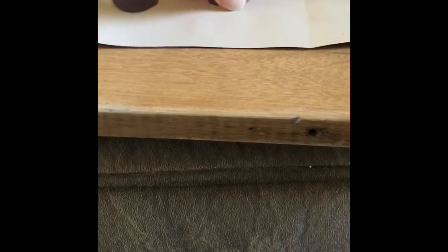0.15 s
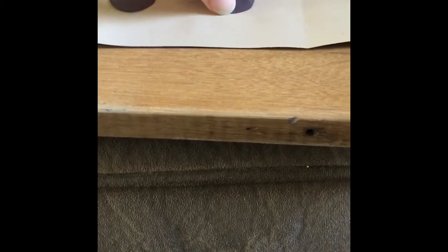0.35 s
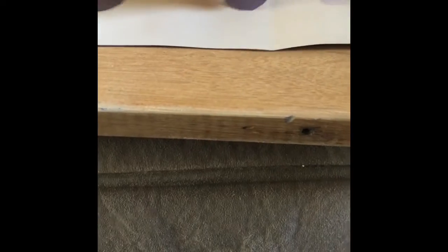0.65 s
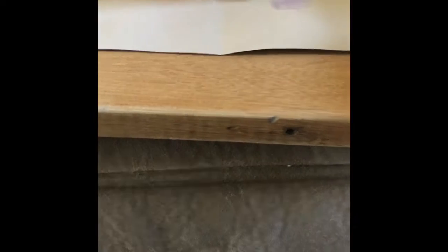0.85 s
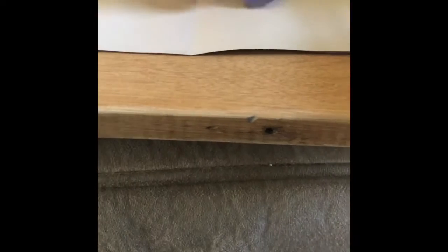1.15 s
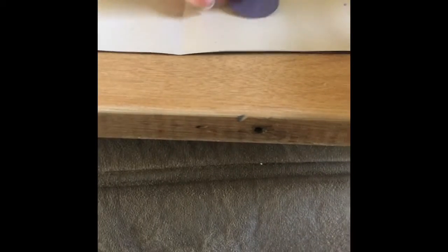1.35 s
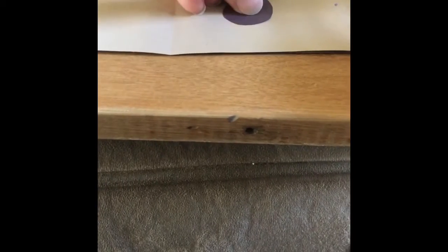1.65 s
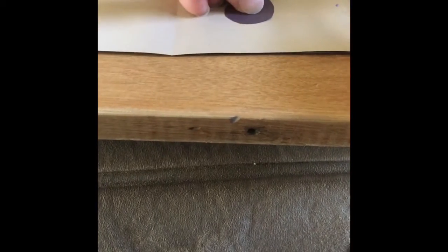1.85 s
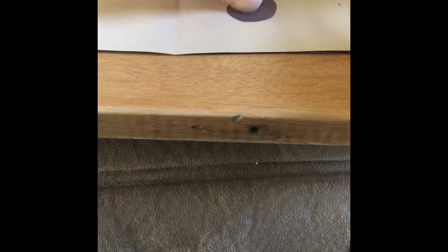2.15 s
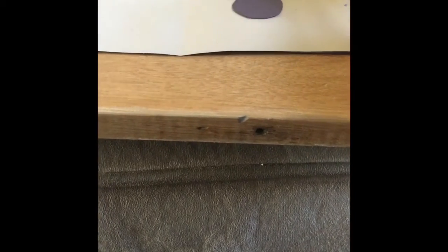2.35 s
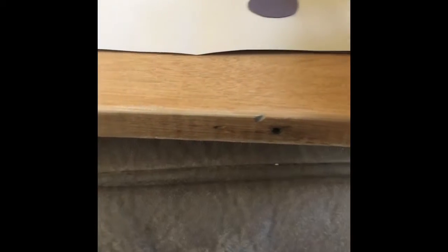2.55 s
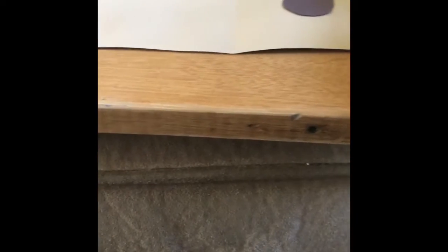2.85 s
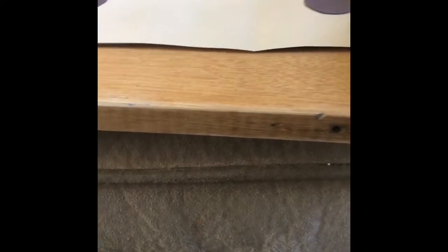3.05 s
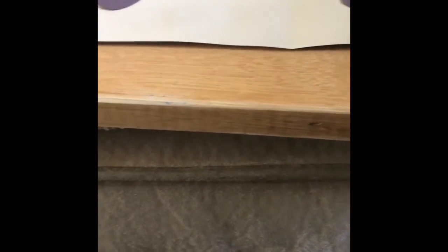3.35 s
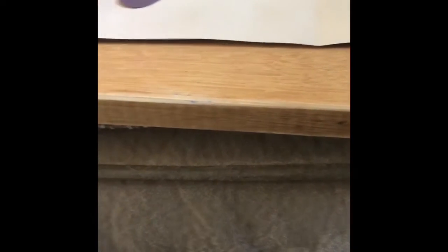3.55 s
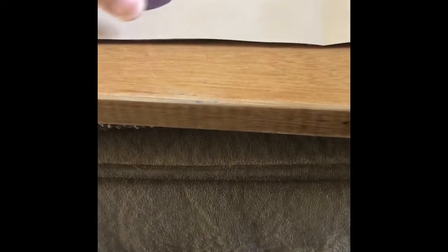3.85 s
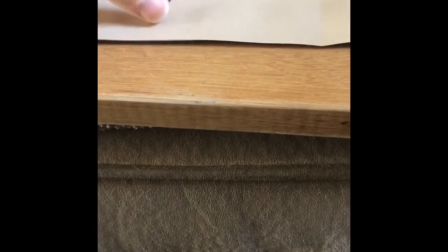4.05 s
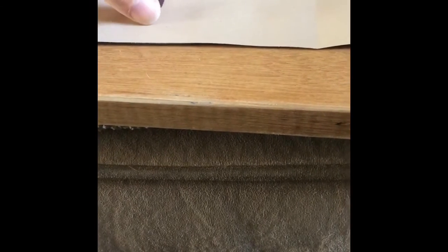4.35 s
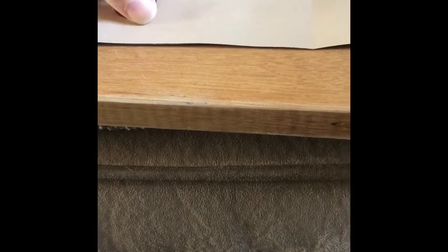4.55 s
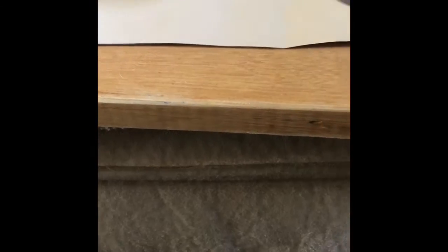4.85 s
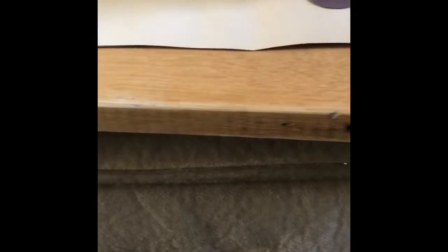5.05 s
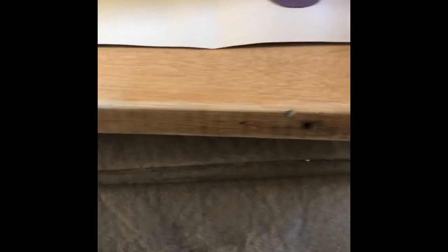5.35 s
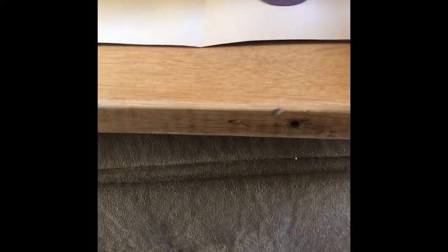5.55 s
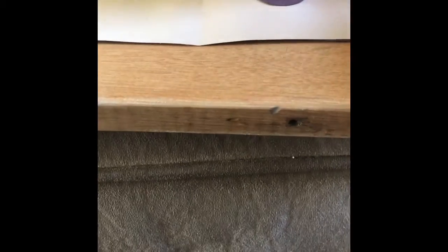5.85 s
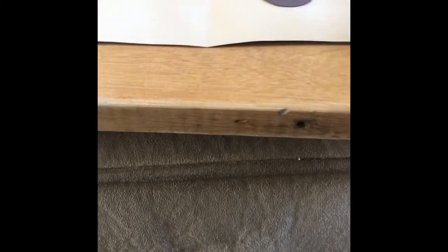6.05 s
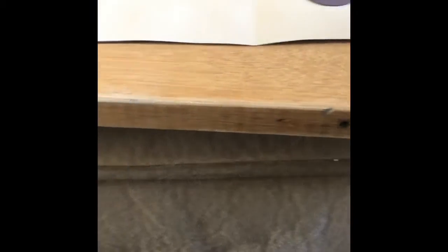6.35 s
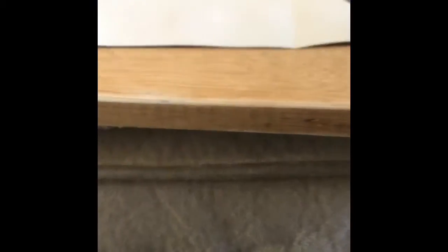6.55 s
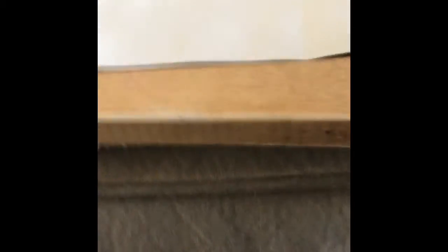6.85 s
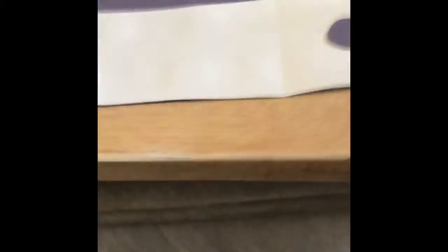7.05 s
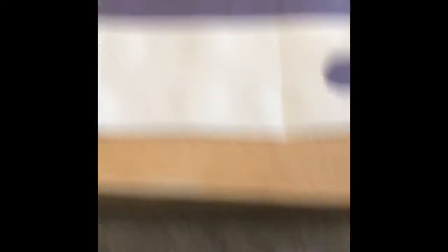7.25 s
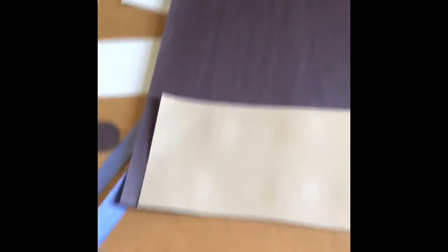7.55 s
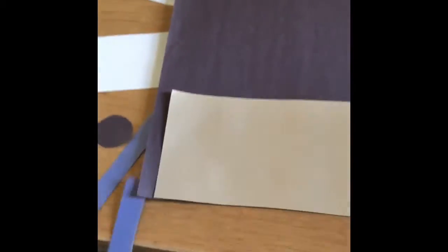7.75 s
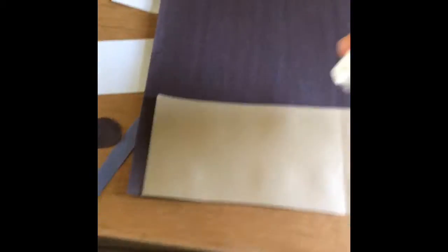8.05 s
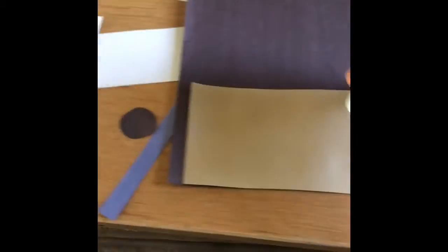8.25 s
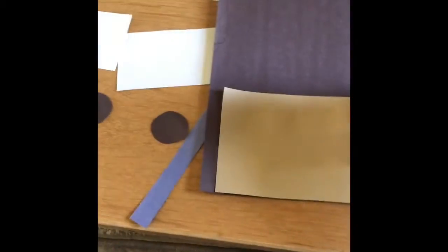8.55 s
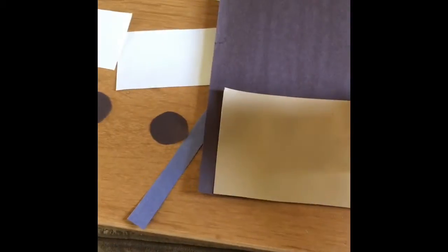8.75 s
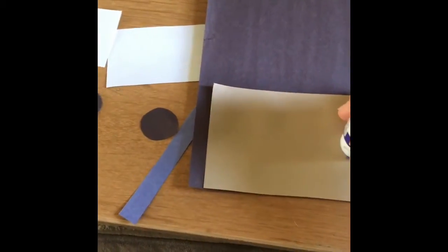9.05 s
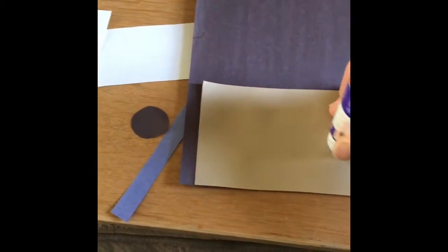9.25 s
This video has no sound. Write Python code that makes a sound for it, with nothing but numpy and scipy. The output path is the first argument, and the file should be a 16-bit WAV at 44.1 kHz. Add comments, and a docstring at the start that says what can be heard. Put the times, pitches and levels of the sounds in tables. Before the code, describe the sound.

Close papery scrapes and sharp tacky clicks as glued pieces are pressed on a tabletop, soft thumps following, in a quiet humming room.

```python
"""Fingertips press and slide glued paper pieces on a wooden table, close to a hand-held phone in a quiet room.
Throughout, filtered noise makes the room's rumble and hiss, and wavering sines an appliance's hum. From the first
moment strokes hiss: noise of catching fibres, shaped by the sheet's modes and bands. Soon tacky paper snaps, as
decaying modes over soft table knocks, sharpest past the middle; faint ticks fall at random. In the second half
the hand that holds the phone adds dull bumps, as low decaying sines."""
import sys
import numpy as np
from scipy import signal
from scipy.fft import rfft, irfft, next_fast_len
from scipy.io import wavfile
from scipy.ndimage import uniform_filter1d

SR = 44100
rng = np.random.default_rng(int(sys.argv[2]) if len(sys.argv) > 2 else 0)


def store_pcm(level_fs):
    """Save levels as 16-bit WAV."""
    pcm = np.round(np.clip(level_fs, -1, 1) * 32767).astype(np.int16)
    wavfile.write(sys.argv[1], SR, np.atleast_2d(pcm).T)


N = 414981


def undb(db):
    """Logarithmic level: 20 dB is a factor of ten in amplitude."""
    return 10 ** (np.asarray(db) / 20)


def unit(x):
    """Mean power: scale a signal to rms 1."""
    return x / np.sqrt(np.mean(x ** 2))


def colour(x, points):
    """Linear filtering: multiply the spectrum by a gain drawn through points of f/Hz, level/dB."""
    hz, db = np.transpose(points)
    size = next_fast_len(len(x))
    f = np.arange(size // 2 + 1) * SR / size + 1  # the 1 Hz keeps the logarithm finite
    gain = undb(np.interp(np.log(f), np.log(hz), db))
    return irfft(rfft(x, size) * gain, size)[:len(x)]


def resonance(x, hz, width):
    """Damped oscillator: a two-pole band-pass, its width in Hz."""
    return signal.lfilter(*signal.iirpeak(min(hz, SR / 2.5), hz / width, SR), x)


def walk(count):
    """Slow random modulation: count random values a second, joined by slopes and scaled by 2.7."""
    k = SR // count
    steps = np.repeat(rng.standard_normal(N // k + 1), k)
    return 2.7 * uniform_filter1d(steps, k)[:N]


def decay(t, t60):
    """Exponential decay: the level falls 60 dB in t60 seconds."""
    return np.exp(-np.log(1000) * t / t60)


def add(out, s, x):
    """Superposition: mix x into out from time s."""
    i = int(s * SR)
    out[i:i + len(x)] += x[:N - i]


def room(level_db=-55.5, split_hz=450, waver_rad=0.92):
    """Stationary noise and beating: rumble and faint hiss, with motor, mains and cabinet tones."""
    # spectrum of the room noise: f/Hz, level/dB
    room_spectrum = [(25, -34.5), (45, -10), (70, -10), (110, -9), (140, -8.5), (200, -7), (250, -0.5),
                     (290, -9), (380, -9), (520, -17.5), (660, -23), (1100, -27), (1500, -33.5),
                     (3300, -35.5), (6000, -42), (16000, -47)]
    # swell of the room's upper hiss: t/s, level/dB
    hiss_swell = [(0, 4.5), (2.5, 1), (4, 2.5), (6, 2.5), (7, 4.5), (8.2, 1.5), (8.6, 0.5), (9.41, 1.5)]
    # motor and mains tones: f/Hz, rms level/dB
    hum_tones = [(44.8, -75.5), (56.65, -67), (113.3, -71), (116.8, -61), (120, -64)]
    # noisy resonances of the cabinet: f/Hz, width/Hz, rms level/dB
    cabinet_modes = [(217.3, 11.5, -63), (261.5, 21.3, -65), (350.1, 18.7, -65)]
    t = np.arange(N) / SR
    air = undb(level_db) * unit(colour(rng.standard_normal(N), room_spectrum))
    upper = signal.sosfilt(signal.butter(1, split_hz, "high", fs=SR, output="sos"), air)
    swell_db = np.interp(t, *np.transpose(hiss_swell)) + 0.8 * walk(count=6)
    air += (undb(swell_db) - 1) * upper
    for hz, db in hum_tones:
        phase = 2 * np.pi * (hz * t + rng.random()) + waver_rad * walk(count=2)  # radians per unit of walk
        air += np.sqrt(2) * undb(db) * np.sin(phase)
    for hz, width, db in cabinet_modes:
        drone = resonance(resonance(rng.standard_normal(N), hz, width), hz, width)
        air += undb(db) * unit(drone)
    return air


def bumps(push_s=0.0024):
    """Damped vibration: soft pushes of the hand ring low and sag in pitch."""
    # bumps of the hand that holds the phone: t/s, level of the decay at its start/dB, starting f/Hz, t60/s
    hand_bumps = [(5.2, -47, 70.5, 0.25), (5.299, -46, 90, 0.091), (6.555, -43, 252, .06),
                  (6.577, -39.5, 87, 0.12), (6.605, -40, 80, 0.13), (6.6, -51, 554, 0.037),
                  (6.665, -40, 520, 0.029), (6.768, -39, 587, 0.042), (6.78, -36, 80, 0.056),
                  (6.88, -37, 150, 0.075), (6.965, -40, 374, 0.042), (6.984, -40, 554, 0.036),
                  (7.004, -30, 414, 0.025), (7.1, -37.5, 153, 0.096), (7.186, -34, 110, 0.054),
                  (7.86, -30, 244, 0.08), (7.873, -34, 94, 0.15)]
    out, t = np.zeros(N), np.arange(SR // 2) / SR
    for s, db, hz, t60 in hand_bumps:
        swing = np.sin(2 * np.pi * hz * t * (1 - 0.41 * t))
        onset = 1 - np.exp(-t / push_s)
        add(out, s, undb(db) * onset * decay(t, t60) * swing)
    return out


def creases(least_db=-56.5, spread_db=2.0, low_hz=4000, high_hz=13000, count=70):
    """Impulse response: faint ticks of the settling sheet, random in moment, peak level and pitch."""
    out, click = np.zeros(N), np.arange(SR // 300) == 0
    for when, size, pitch in rng.random((count, 3)):
        hz = low_hz * (high_hz / low_hz) ** pitch
        tick = resonance(1. * click, hz, hz / 2)
        peak_db = least_db - spread_db * np.log(size)
        add(out, when * N / SR, undb(peak_db) * tick / abs(tick).max())
    return out


def snaps(fall_db=5.5, knock_fall_db=11.5, scatter_db=3.0, after_db=-25.0, tear_s=0.0014, late_s=0.0014,
          knock_cycles=1.146):
    """Modal excitation: the bond yields in one jerk and many small ones, and paper and table ring in answer."""
    # snaps of tacky paper: t/s (each sounds late_s later), peak level/dB, f of the strongest paper modes/Hz,
    # table knock level against that peak/dB, f of the knock/Hz
    snap_events = [(0.157, -26, 8200, -38, 490), (0.212, -27, 7300, -36, 533),
                   (0.38, -14.5, 6700, -15, 1290), (0.436, -33.5, 3870, -29, 689),
                   (1.0393, -45, 13700, -21, 592), (1.068, -52, 3330, -15, 495),
                   (1.169, -51, 3300, -5, 509), (1.255, -52, 12100, -16, 517), (1.547, -34, 7440, -16, 676),
                   (1.9862, -25, 8200, -21, 1180), (2.0013, -38, 2770, -10, 549),
                   (2.8439, -45.5, 12200, -10, 511), (3.0738, -53, 2770, -15, 503),
                   (3.107, -57, 3060, 2, 549), (3.3557, -19, 6300, -13, 490), (3.3867, -50, 4910, 3, 509),
                   (3.4126, -31.5, 3170, -6, 505), (4.432, -23.5, 8300, -25, 485),
                   (4.5006, -26, 4500, -11.5, 1390), (4.979, -55, 7100, -8, 557),
                   (5.5805, -36.5, 9350, -25, 568), (5.6267, -5, 9700, -25, 1170),
                   (5.659, -16, 8700, -27, 1500), (5.664, -26, 6960, -27, 544),
                   (5.8483, -51, 6500, -10, 570), (6.1968, -46, 12000, -25, 500),
                   (6.5556, -41.5, 4400, -5.5, 724), (6.5928, -39.5, 5340, -2, 676),
                   (6.7664, -40.5, 3570, 6, 620), (6.789, -36, 4440, -28, 482),
                   (6.9637, -46, 4080, 10, 510), (7.0087, -51.5, 4130, 10, 490),
                   (7.294, -44, 4390, -14, 697), (8.167, -31.5, 3500, -40, 482),
                   (8.1844, -42, 4850, -21, 482), (8.2473, -33.5, 6270, -25, 692),
                   (8.2609, -34.5, 4070, -12, 824), (8.294, -40, 4700, -26, 576),
                   (8.6347, -47, 4410, -17, 746), (9.042, -44, 7470, -29, 483),
                   (9.2577, -46, 9800, -17, 500)]
    # modes that a snap rings, table top below 1500 Hz and paper above: f/Hz, t60/s
    ring_modes = [(480, 0.018), (700, .015), (950, 0.019), (1300, 0.014), (1700, 0.0052), (2150, 0.0027),
                  (2750, 0.005), (3500, 0.003), (4500, 0.0052), (5400, 0.0028), (6600, 0.0029),
                  (7800, 0.0031), (9500, 0.0035), (11300, 0.002), (14000, 0.00187)]
    out, t = np.zeros(N), np.arange(SR // 25) / SR
    hz, t60 = np.transpose(ring_modes)[:, :, None]
    mode_hz = hz[:, 0]
    wood = mode_hz < 1500
    ring = np.sin(2 * np.pi * hz * t) * decay(t, t60)
    # bending waves in the board are slower the lower they are, so the low modes arrive late
    late = np.maximum(t - knock_cycles / hz, 0)
    board = np.sin(2 * np.pi * hz * late) * decay(late, t60)
    # neighbouring modes start in opposite directions, so no holes open between them
    signs = (-1) ** np.arange(len(ring_modes))
    chance = rng.standard_normal((len(snap_events), len(ring_modes)))
    jerks = rng.standard_normal((len(snap_events), 200))
    for (s, peak_db, bright_hz, knock_db, knock_hz), c, jerk in zip(snap_events, chance, jerks):
        # modes weaken by fall_db or knock_fall_db for each octave from the strongest pitch
        gain = undb(scatter_db * c - fall_db * abs(np.log2(mode_hz / bright_hz)))
        paper = (gain * ~wood * signs) @ ring
        push = undb(after_db) * jerk * np.exp(-t[:len(jerk)] / tear_s)
        push[0] = 1  # the main jerk
        paper = np.convolve(paper, push)
        knock_gain = undb(-knock_fall_db * abs(np.log2(mode_hz / knock_hz)))
        table = (knock_gain * wood) @ board
        add(out, s + late_s, undb(peak_db) * paper / abs(paper).max())
        add(out, s + late_s, undb(peak_db + knock_db) * table / abs(table).max())
    return out


def stroke_db(t, start_s, attack_s, hold_s, release_s, db, edge_db=21):
    """Envelope linear in dB: rise by edge_db, hold, fall by edge_db a release time for two; else silence."""
    early = (start_s + attack_s - t) / max(attack_s, 1 / SR)
    late = (t - start_s - attack_s - hold_s) / max(release_s, 1 / SR)
    off = np.maximum(np.maximum(early, late), 0)
    return np.where((early < 1) & (late < 2), db - edge_db * off, -np.inf)


def slides(catch_db=3.0, flicker_db=0.5, patchy_db=2.0, waver_db=2.0, sharp=9.24, pivot_hz=6000, edge_s=0.0015):
    """Stick-slip friction: fibres catch and let go by the thousand, and the sheet's modes colour the noise."""
    # ways the sheet sings, by name: f/Hz, width of each filter pass/Hz, level against the broad hiss/dB,
    # second broad band f/Hz, its level/dB, tilt of the hiss around pivot_hz/(dB per octave)
    singing = {"press": (7200, 2400, -1, 4107, -4.5, 3.1), "rub": (3711, 1000, -5.5, 7050, -2, -4),
               "low": (3313, 648, -3, 8800, -20, 4.5), "airy": (8200, 2800, -32, 13000, -23, 6),
               "sweep": (7100, 3000, -14, 3700, -22, 1.6), "drag": (3302, 600, -13, 8800, -22, 2),
               "dull": (2900, 1300, 7, 1500, 1, -13), "thin": (6700, 800, -13, 13400, -18, 4),
               "scuff": (4298, 1900, -11.5, 9000, -9.5, 1.1),
               "tear": (4502, 2512, -11, 9495.5, -10.5, -1.5),
               "hollow": (1522, 256, -6.5, 13900, -18, -1.5), "dark": (4500, 1902, -5.5, 5500, -34, -2.5),
               "broad": (6500, 4000, -18, 2197, -14, -3), "whine": (10500, 600, -7, 8400, -19, -7),
               "whistle": (4235, 296, 1, 10200, -22, 1)}
    # spectrum of the sheet: f/Hz, level/dB
    sheet_spectrum = [(350, -52), (600, -10), (858, -13.5), (1160, -7.5), (1780, -8), (3210, -4),
                      (5330, -1.5), (8050, -2), (10700, -5.5), (15100, -3.5), (16000, -21)]
    # strokes of a finger or an edge: start t/s, attack/s, hold/s, release/s, level/dB, way the sheet sings
    finger_strokes = [ (0.007, 0.021, 0.042, 0.11, -50, "press"),
                      (0.136, 0.0032, 0.076, 0.034, -45, "press"),
                      (0.141, 0.016, 0.0018, 0.01, -34.5, "press"),
                      (0.267, 0.035, .006, 0.044, -42.5, "press"), (0.34, 0.011, 0.035, .02, -57, "press"),
                      (0.064, 0.018, .035, .012, -54, "press"), (0.263, 0.0086, .004, .01, -51.5, "press"),
                      (0.398, 0.032, .004, 0.065, -49, "rub"),
                      (0.484, 0.0087, 0.013, 0.044, -48.5, "press"),
                      (.515, 0.026, 0.084, 0.21, -40.5, "sweep"), (0.678, .03, 0.12, 0.039, -49, "sweep"),
                      (0.87, .01, 0.051, 0.012, -67, "low"), (1.038, 0.014, .15, .025, -61, "low"),
                      (1.333, 0.0036, 0.11, 0.016, -51.5, "rub"), (1.465, 0.021, .11, 0.022, -51.5, "rub"),
                      (1.494, 0.052, 0.016, .055, -49.5, "scuff"), (1.91, 0.011, .005, .05, -63.5, "press"),
                      (1.956, 0.032, .002, .03, -50.5, "press"), (1.998, 0.019, 0.054, .03, -57, "press"),
                      (2.146, 0.012, 0.0022, 0.0073, -49.5, "airy"), (2.748, .022, .004, 0.085, -60, "low"),
                      (2.922, 0.008, .003, 0.027, -68, "low"), (3.065, 0.012, .002, 0.014, -56, "dull"),
                      (3.096, 0.025, .002, .012, -56.5, "dull"), (3.13, 0.02, 0.13, .04, -80, "rub"),
                      (2.237, 0.027, 0.018, 0.035, -75, "airy"), (3.37, .01, 0.17, .05, -72.5, "airy"),
                      (3.612, 0.068, 0.061, 0.27, -61, "thin"), (3.817, .012, 0.076, 0.077, -59.5, "thin"),
                      (4.079, .027, 0.031, 0.051, -66.5, "airy"), (4.152, 0.054, .005, 0.18, -64.5, "airy"),
                      (4.241, 0.057, .005, 0.055, -61.5, "airy"), (4.5, 0.0083, 0.014, .09, -52.5, "scuff"),
                      (4.554, 0.054, .002, 0.05, -44.5, "scuff"),
                      (4.63, 0.043, .002, 0.059, -39.5, "scuff"), (4.76, 0.067, .015, 0.14, -54, "drag"),
                      (4.89, 0.019, 0.085, 0.022, -63, "drag"), (5.014, 0.041, 0.014, 0.0088, -61, "drag"),
                      (5.122, .007, 0.056, 0.025, -57.5, "airy"),
                      (5.256, 0.0017, 0.067, 0.028, -46, "scuff"),
                      (5.337, 0.022, 0.13, 0.026, -63.5, "drag"),
                      (5.509, 0.032, .002, 0.031, -54.5, "scuff"), (5.586, 0.037, .002, 0.021, -37, "tear"),
                      (5.626, .01, 0.034, 0.0257, -48, "tear"),
                      (5.837, 0.01, 0.0088, 0.0074, -48.5, "airy"), (5.864, .014, .002, .015, -61, "airy"),
                      (5.913, 0.033, 0.061, .05, -64, "hollow"), (6.07, .02, 0.15, .03, -72, "hollow"),
                      (6.211, 0.028, 0.025, 0.02, -57, "scuff"), (6.265, 0.046, .004, 0.025, -59, "scuff"),
                      (6.351, .029, .002, 0.13, -57.5, "scuff"), (6.423, 0.058, 0.07, 0.075, -63, "airy"),
                      (6.611, 0.02, 0.047, 0.048, -51.5, "dark"), (6.691, .035, 0.024, 0.05, -49.5, "dark"),
                      (6.76, .02, 0.053, .03, -64, "broad"), (6.819, 0.056, 0.18, 0.11, -55.5, "dark"),
                      (7.056, 0.079, 0.13, 0.076, -59.5, "whistle"), (7.314, 0.1, .04, .1, -77, "scuff"),
                      (7.297, 0.071, 0.46, 0.071, -65.5, "broad"),
                      (7.617, 0.034, 0.21, 0.023, -71, "whistle"), (7.11, .03, 0.35, 0.034, -70, "whine"),
                      (7.733, .01, 0.019, .02, -66, "scuff"), (7.769, .04, 0.019, 0.0066, -54, "sweep"),
                      (7.832, 0.029, 0.306, 0.047, -64, "hollow"), (7.92, 0.087, .04, .12, -65, "broad"),
                      (8.169, 0.0039, .002, 0.065, -54.5, "dark"), (8.292, 0.0092, 0.028, .05, -53, "dark"),
                      (8.339, 0.021, .025, 0.011, -59.5, "sweep")]
    # flicker_db, patchy_db and waver_db are dB per unit of walk
    catches = uniform_filter1d(rng.standard_normal(N), size=12) * np.sqrt(12)
    fibres = unit(rng.standard_normal(N) * undb(catch_db * catches))
    fibres = fibres * undb(flicker_db * walk(count=70))
    # the sheet bends under the finger, so its many modes swell and fade each on its own
    modes = 700 * 2 ** np.arange(0, 4.6, 1 / 6)
    hiss = sum(undb(patchy_db * walk(count=12)) * resonance(fibres, hz, hz / sharp) for hz in modes)
    hiss = colour(hiss, sheet_spectrum)
    out, t = np.zeros(N), np.arange(N) / SR
    waver = undb(waver_db * np.array([walk(count=9), walk(count=9)]))
    for name, (hz, width, sing_db, other_hz, other_db, tilt_db) in singing.items():
        # the tilt spans an octave either side of the pivot
        sound = unit(colour(hiss, [(pivot_hz / 2, -tilt_db), (2 * pivot_hz, tilt_db)]))
        bands = ((hz, width, sing_db, waver[0]), (other_hz, other_hz / 1.64, other_db, waver[1]))
        for f, w, db, swell in bands:
            # each band is drawn from the sound so far
            band = unit(resonance(resonance(sound, f, w), f, w))
            sound = sound + undb(db) * swell * band
        touch = np.zeros(N)
        for *stroke, kind in finger_strokes:
            if kind == name:
                near = slice(int(stroke[0] * SR), int((stroke[0] + 1) * SR))
                touch[near] = np.maximum(touch[near], undb(stroke_db(t[near], *stroke)))
        # a short average softens the edges of the strokes
        out += uniform_filter1d(touch, max(int(edge_s * SR), 1)) * unit(sound)
    return out


def scene(tail_db=-32.5, tail_t60_s=0.037):
    """Reverberation by convolution: near sounds gain a faint short tail of decaying noise, over the room."""
    near = slides() + snaps() + creases()
    t = np.arange(int(.2 * SR)) / SR
    tail = rng.standard_normal(len(t)) * decay(t, tail_t60_s)
    wet = signal.fftconvolve(near, tail / np.sqrt(np.sum(tail ** 2)))[:N]
    return (near + undb(tail_db) * wet + bumps() + room())[None]


def record(dry, top_hz=15900):
    """Band limitation: the phone cuts the top with a steep elliptic low-pass."""
    return signal.sosfilt(signal.ellip(8, .2, 60, top_hz, fs=SR, output="sos"), dry)


dry = scene()
out = record(dry)
store_pcm(out)
```